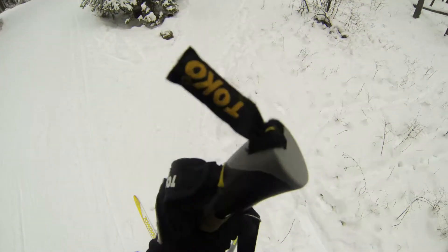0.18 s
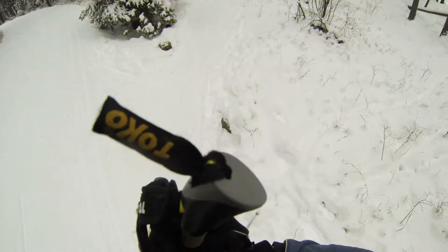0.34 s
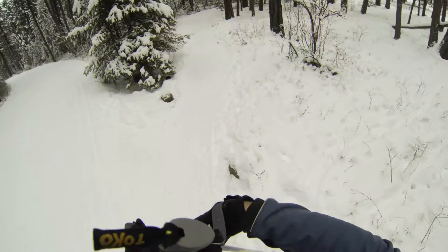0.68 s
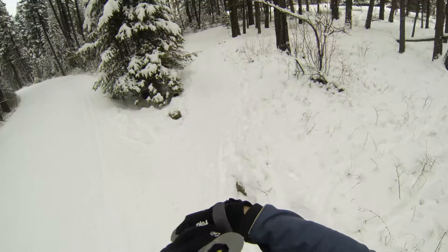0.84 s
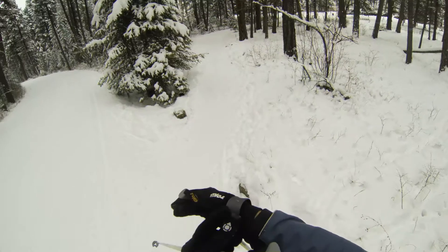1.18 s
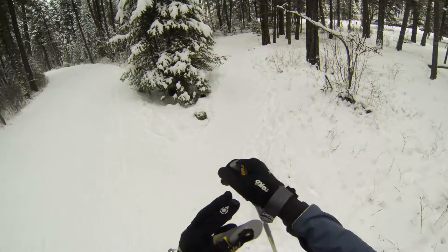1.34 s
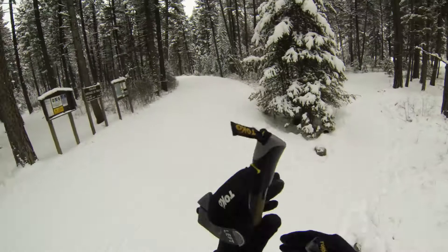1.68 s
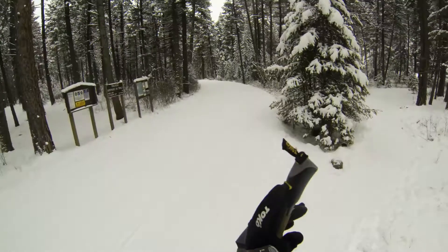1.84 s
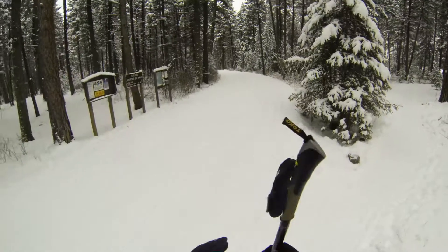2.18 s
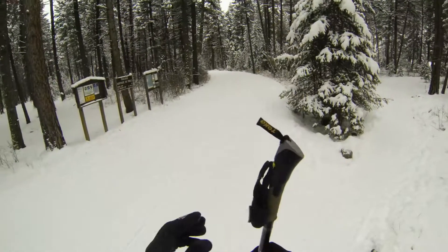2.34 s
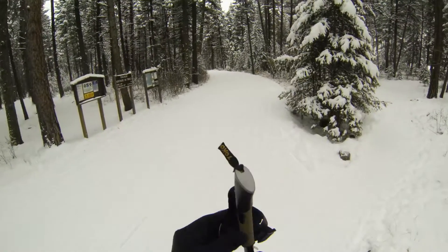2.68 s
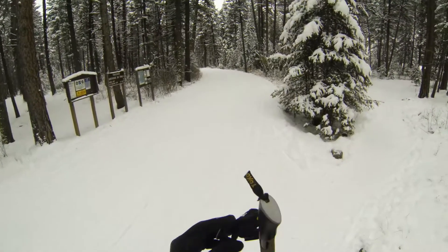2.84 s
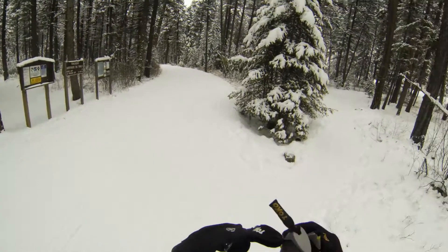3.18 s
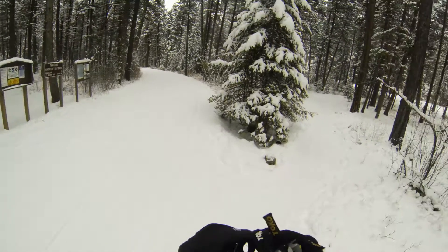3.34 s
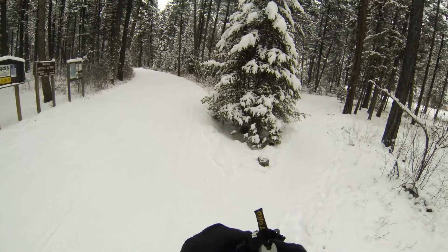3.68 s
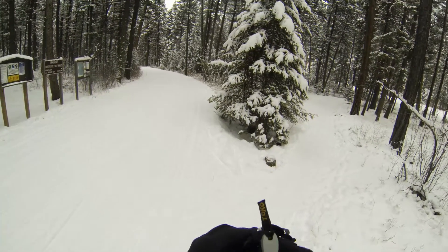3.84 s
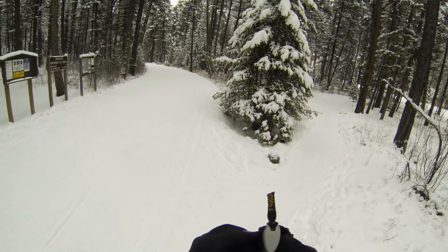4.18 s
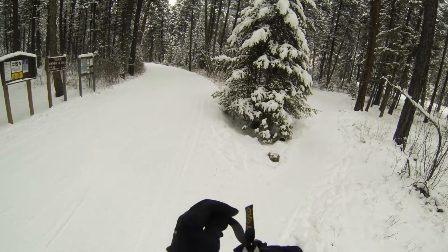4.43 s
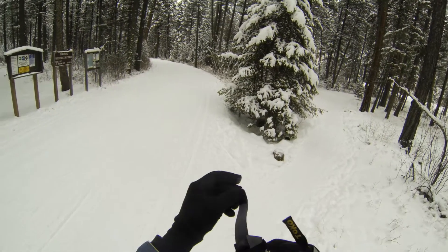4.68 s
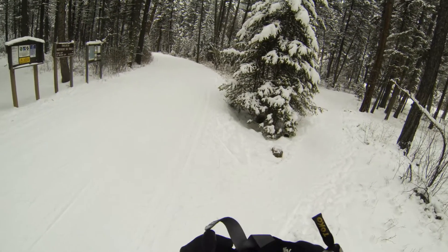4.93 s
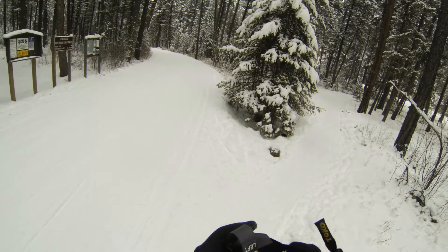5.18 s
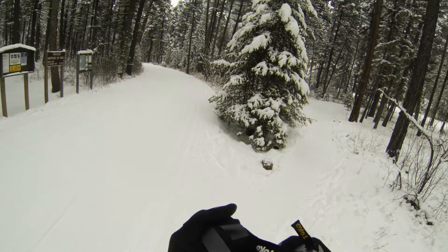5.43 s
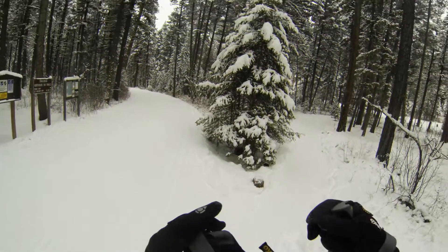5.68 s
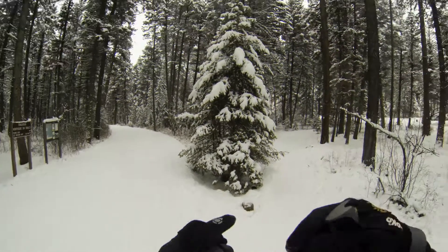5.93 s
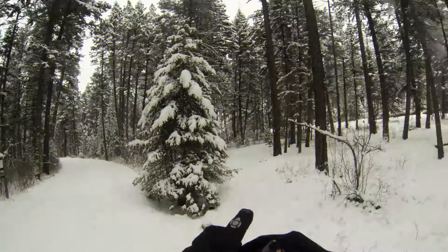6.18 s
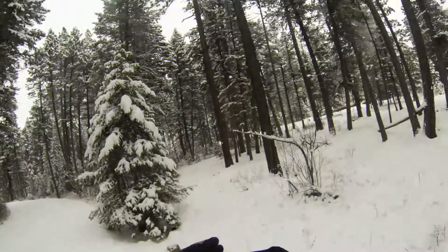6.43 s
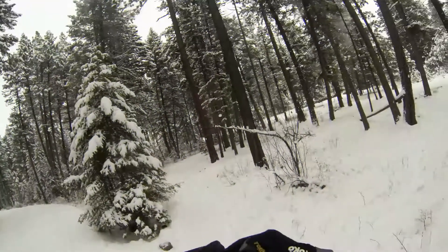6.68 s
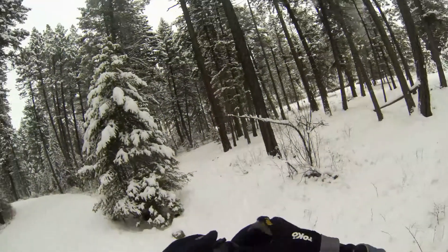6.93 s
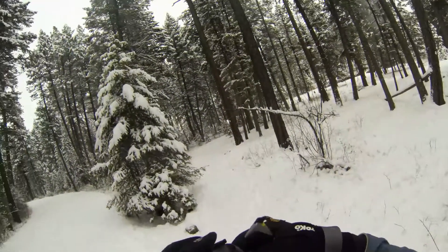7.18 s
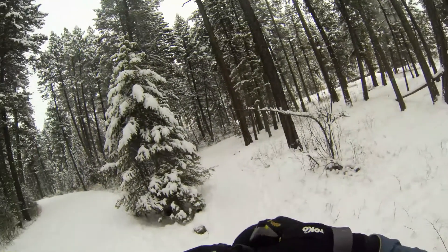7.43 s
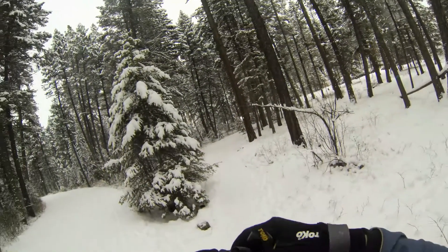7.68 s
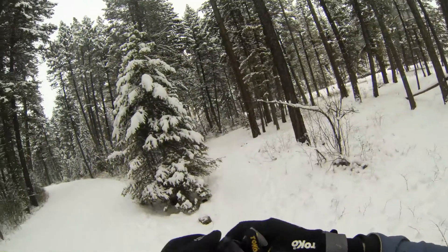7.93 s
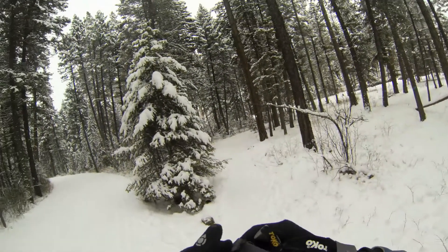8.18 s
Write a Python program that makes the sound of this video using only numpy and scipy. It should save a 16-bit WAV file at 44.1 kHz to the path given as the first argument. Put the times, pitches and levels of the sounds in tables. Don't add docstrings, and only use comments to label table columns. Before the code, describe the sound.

Outdoors on packed snow, heard from inside a sealed helmet-camera case. Low wind rumble buffets the microphone while two ski poles clack four times, each louder, with a short echo. A ski scrapes the crust and a pole grip is knocked. Gloves and straps rub and tick, a buckle snaps, a strap rips open, another buckle snaps, and finally a pole shaft pings.

```python
import sys
import numpy as np
from scipy import signal
from scipy.fft import rfft, irfft, next_fast_len
from scipy.io import wavfile
from scipy.ndimage import uniform_filter1d, map_coordinates

SR = 44100
rng = np.random.default_rng(int(sys.argv[2]) if len(sys.argv) > 2 else 0)


def store_pcm(level_fs):
    pcm = np.round(np.clip(level_fs, -1, 1) * 32767).astype(np.int16)
    wavfile.write(sys.argv[1], SR, np.atleast_2d(pcm).T)


def makeup_ratio(level_db):
    decades = np.asarray(level_db, float) / 20
    return 10 ** decades


N = 365588

# time in seconds, deep rumble in dB, upper rumble in dB re deep.
WIND_CURVE = [(0.0, -17, -10.5), (.3, -19, -8), (.55, -21, -12.5), (.9, -23, -12), (1.15, -26, -7),
              (1.35, -20.5, -8), (1.6, -23.5, -10), (1.95, -22, -10), (2.3, -32, -4), (2.75, -25.5, -8.5),
              (3.15, -30.5, -7), (3.7, -30.5, -6), (4.3, -31, -10), (4.7, -27, -10), (5.3, -27, -13.5),
              (6.3, -29.5, -9), (7.2, -31, -6.5), (8.29, -28.5, -8.5)]
# frequency in Hz, level in dB per Hz.
DEEP_SPECTRUM = [(5, -33), (12, 7.5), (25, 0), (40, -3.5), (70, -43), (200, -77.5)]
# frequency in Hz, level in dB per Hz.
UPPER_SPECTRUM = [(20, -59), (42, 3), (60, -1.5), (80, -9.5), (110, -23), (170, -31.5), (400, -67)]
# time in seconds, level in dB, frequency in Hz signed by
LOW_BUMPS = [
    (1.7565, -13.5, -64.5, 2.25),
    (3.983, -12.5, 40, 0.81),
    (4.61, -19, 40, 1.5),
    (6.81, -23, 61, 1.75),
    (.012, -13, 23.5, 1.17),
]
GUST_DEPTH_DB, GUSTS_PER_S = 1.63, 6

# frequency in Hz, level in dB per Hz.
HISS_SPECTRUM = [(30, -19.5), (100, -1), (300, -8.5), (860, -13.5), (1800, -18), (3200, -19.5),
                 (6300, -25.5), (7700, -28.5), (8300, -24.5), (9200, -28.5), (11200, -30.5), (13000, -35),
                 (13700, -32), (15000, -36)]
HISS_DB = -47.5
# frequency in Hz, level in dB.
WHINE_TONES = [(7028, -58.5), (14056, -58.5)]
# frequency in Hz, gain in dB.
WRITE_SAG = [(7000, 0), (8300, -2.5), (12000, -2), (13200, -4), (14400, -4), (15000, -5)]
# frequency in Hz, share of patches lost.
TOP_GAPS = [(12600, 0), (13000, .4), (14000, .35), (14500, .55), (15000, .85)]
WRITES_PER_S, FIRST_WRITE_S, LATE_S = 12, .002, .006
WRITE_MS, WRITE_SPREAD_MS = 34, 4

# frequency in Hz, width in Hz, level in dB.
CASE_FAMILIES = [
    [(1244, 112, -4.5), (1436, 137, -2), (1579, 78, 1.5), (1968, 89, -13)],
    [(2176, 130, 3.5), (2392, 170, -1)],
    [(2915, 200, -5), (2873, 67, -6), (3162, 156, 2.5), (3576, 440, -7)],
    [(4650, 140, 3.5), (5380, 340, -7.5), (6410, 280, -5.5), (8230, 500, -8), (9670, 410, -11),
     (12700, 4400, -23.5)],
]

# time in seconds, effort in dB.
RUSTLE_CURVE = [(0.0, -56), (0.3, -51), (1.13, -51), (1.27, -44), (1.34, -38), (1.43, -46), (1.68, -51),
                (2.33, -54.5), (2.72, -47), (3.35, -47), (3.88, -52), (4.48, -50), (4.7, -53.5),
                (5.79, -53.5), (6.26, -48.5), (6.55, -55), (7.02, -49), (8.29, -56)]
THIRD_DB, THIRD_FOLLOWS = -62, 0.62
# time in seconds, level in dB.
SCRAPE_CURVE = [(1.2, -44), (1.21, -51), (1.242, -32.5), (1.292, -23.5), (1.358, -34.5), (1.544, -41.5),
                (1.61, -56), (1.62, -40), (1.66, -55)]
# frequency in Hz, level in dB per Hz.
CRUST_SPECTRUM = [(50, -45), (140, -9), (300, -22), (600, -24), (1000, -20), (1250, -1), (1600, -1),
                  (2000, -13), (2400, -15), (3200, -24), (3900, -30.5), (5500, -48), (9000, -70)]

# start in seconds, length in ms, first family in dB, third in dB re first.
RUBS_LONG = [(.402, 27, -47, -7), (1.865, 53, -43.5, -4), (1.94, 30, -49.5, -9), (2.52, 57, -45.5, -13),
             (2.722, 137, -47, -6.5), (2.565, 30, -58, 3), (3.09, 60, -59, 2.2), (3.19, 99, -54.5, -1.2),
             (3.935, 44, -50.5, -1.5), (4.045, 31, -62.5, 10), (4.3, 70, -52, -1.2), (4.43, 83, -60.5, 6),
             (4.64, 64, -48, -7), (5.18, 54, -51.5, -5), (5.33, 50, -56, 0), (6.12, 59.6, -52.5, 1),
             (7.04, 110, -56, -4), (7.2, 110, -54, -8), (7.49, 40, -51.5, -3), (7.97, 45, -49.5, -10.5),
             (8.235, 37, -52, -2)]
RUB_SECOND_DB, RUB_FOURTH_DB = -10.5, -6.5

# time in seconds, first family in dB, third in dB re first.
FAINT_TICKS = [(0.4549, -41, -6), (1.879, -43, -5), (2.8103, -47, -2.2), (3.745, -39, -7),
               (3.937, -39, -13), (4.0432, -52, 6), (4.0891, -50, 12), (4.3697, -46, 8), (4.6594, -44, -9),
               (4.833, -42, 2), (5.034, -41.5, 4), (5.084, -39, -4), (6.135, -39, -5), (6.5094, -42.5, 3.5),
               (6.9336, -40, 0), (7.047, -39, -16), (7.135, -42.5, 2), (7.4974, -40, 1.2),
               (7.976, -46, -15), (8.2432, -39, 0)]
TICK_SECOND_DB, TICK_FOURTH_DB, TICK_MS = -12, -4, 2.3
# time in seconds, first family in dB,
# third in dB re first, fourth in dB re first, contact in ms.
FIRM_SNAPS = [(0.4, -24, 0.5, -11, 6.4), (0.4912, -28, 2, -10, 2.7), (1.2446, -24, -26, -33, 2.7),
              (1.6193, -30.5, 3, -2, 2.5), (1.7266, -29, 0, -9, 2.5), (1.7342, -28, -22, -26, 2.5),
              (1.7401, -25, -12, -18, 2.5), (1.7625, -31, -1.5, -3, 1.7), (1.8995, -37, -2, -5, 2.5),
              (2.5212, -34, 0.5, -17, 3.3), (2.6336, -42, 10, -1, 2.9), (2.7266, -34.5, -1, -5, 3.4),
              (2.7706, -37, 4, -3, 3.4), (4.226, -34, 2, -18, 2.5), (4.3363, -31, 5.5, -12, 5.4),
              (6.121, -35, -2, -8, 2.5), (6.296, -35.5, -17, 0.5, 2.1), (7.928, -37, -17, -18.5, 2.5),
              (8.0778, -33, -12, -18, 2.1), (8.1534, -37.5, -4, -16, 2.5)]
SNAP_SECOND_DB = -3

# time in seconds, third family in dB, first in dB re third.
STRAP_HOOKS = [(4.1121, -30, -13), (4.1177, -32, -10.2), (4.125, -29, -12), (4.1317, -30, -11),
               (4.141, -21, -15), (4.146, -20, -10.2), (4.153, -17, -10), (4.16, -35, 6), (4.166, -25, -6),
               (4.17, -22, -13), (4.1806, -25.5, -2), (4.187, -28, 1), (4.1949, -23, -4), (4.1984, -25, -3),
               (4.204, -21.5, -17)]
HOOK_FOURTH_DB, TIGHTEN_DB_PER_S = -21.5, 132

# frequency in Hz, level in dB, t60 in seconds.
RINGING_STRIKES = [
    ((3.859, -19, 0.34), [(1260, -7.5, 0.044), (1640, 2, 0.022), (1950, -2.5, 0.019), (2420, -4.5, 0.02), (2780, -6, .016), (3140, -5, 0.018), (3800, -7, .014), (4520, -10, 0.013), (5480, -5.5, 0.013), (7840, -7, 0.0094), (14000, -16, .007)]),
    ((6.105, -14.5, 0.35), [(1254, -7.5, 0.035), (1550, 2, 0.021), (2370, -12.5, .02), (3310, 1, 0.013), (4670, -16, .012), (7400, -7, 0.0079), (11100, -15, 0.008)]),
    ((6.778, -15, .8), [(1611, 0, 0.087), (1405, -5, 0.041), (1526, -2, .045), (1910, -22, .05), (2240, -11.5, 0.031), (3230, -18, .012), (4600, -28, .006)]),
]
# third family in dB, fourth family in dB.
STRIKE_CRACKS = [
    (-23.5, -28.5),
    (-27, -25.5),
    (-33, -41),
]
# frequency in Hz, level in dB, t60 in seconds.
GRIP_MODES = [(650, -11.5, 0.054), (1390, 0, 0.034), (1600, -9, 0.046), (2230, -9, 0.03), (3170, -6, 0.018),
              (3655, -17, 0.015), (4700, -16, 0.008)]
# time in seconds, level in dB, rise in ms.
GRIP_BLOW = (1.7265, -18.5, 0.36)

# time in seconds, peak in dB, low modes in dB re peak.
POLE_CLACKS = [
    (0.2399, -16.5, -4.5),
    (0.5183, -12.5, -3),
    (0.7974, -9.5, -3.5),
    (1.072, -2.5, -8),
]
# frequency in Hz, width in Hz, level in dB.
POLE_LOW_MODES = [(826, 56, -20), (1259, 40, 0), (1565, 97, -1), (1890, 97, -5.5)]
# frequency in Hz, width in Hz, level in dB.
POLE_HIGH_MODES = [(2380, 82, -4), (2790, 164, 2), (3150, 364, 3), (3457, 362, -1.5), (4050, 150, -25),
                   (4700, 100, -18.5), (5200, 190, -23.5), (7700, 500, -37)]
CLACK_VARY_DB = 1.8
# echo delay in seconds, echo in dB, scatter in dB, t60 in seconds of low and of high modes.
GROUND_REPLY = (.0172, -14.5, -15, 0.2, 0.23)


def unit(x):
    return x / np.sqrt(np.mean(x ** 2) + 1e-20)


def curves(rows):
    s, *cols = np.transpose(rows)
    return [np.interp(np.arange(N) / SR, s, c, -120, -120) for c in cols]


def on_log(points, hz):
    f, v = np.transpose(points)
    return np.interp(np.log(hz + 1), np.log(f), v)


def wobble(knots_per_s):
    knots = rng.standard_normal(int(N * knots_per_s / SR) + 4)
    return map_coordinates(knots, [np.arange(N) * knots_per_s / SR])


def filtered(x, response):
    m = next_fast_len(N + SR // 2)
    return irfft(rfft(x, m) * response(np.fft.rfftfreq(m, 1 / SR)), m)[..., :N]


def coloured(x, spectrum):
    return unit(filtered(x, lambda hz: makeup_ratio(on_log(spectrum, hz))))


def grit(spread_db, clumps_per_s, depth_db):
    size = np.minimum(rng.exponential(size=N), 3)
    clump_db = depth_db * np.clip(wobble(clumps_per_s), -2, 2)
    return unit(rng.standard_normal(N) * makeup_ratio(spread_db * size + clump_db))


def family(x, modes):
    f = np.fft.rfftfreq(8192, 1 / SR)
    ring = 0
    for k, (hz, width_hz, db) in enumerate(modes):
        damping = 1j * f * width_hz
        ring = ring + (-1) ** k * makeup_ratio(db) * damping / (hz * hz - f * f + damping)
    band_hz = [0.8 * modes[0][0], 1.49 * modes[-1][0]]
    walls = signal.freqs(*signal.butter(3, band_hz, "band", analog=True), f)[1]
    answer = irfft(ring * walls)
    return signal.oaconvolve(x, answer / np.abs(answer).max())[:N]


def contacts(rows):
    force, t = np.zeros((4, N + 2000)), np.arange(2000) / SR
    for s, *db, ms in rows:
        burst = rng.standard_normal(len(t)) * np.exp(-t * 1000 / ms)
        burst[0] = 0.66 * np.linalg.norm(burst)
        colour = rfft(burst)
        even = irfft(colour / np.abs(colour) ** .8, len(t))
        burst = even * np.exp(-t * 400 / ms)
        burst = burst / np.linalg.norm(burst)
        force[:, round(s * SR):][:, :len(t)] += makeup_ratio(np.array(db))[:, None] * burst
    return sum(family(f[:N], modes) for f, modes in zip(force, CASE_FAMILIES))


def writes():
    k = np.arange(int(N / SR * WRITES_PER_S) + 1)
    luck = rng.standard_normal((len(k), 2))
    start_s = FIRST_WRITE_S + k / WRITES_PER_S + LATE_S * np.abs(luck[:, 0])
    return list(zip(start_s, WRITE_MS + WRITE_SPREAD_MS * luck[:, 1]))


def electronics(air):
    t, whine, busy = np.arange(N) / SR, np.zeros(N), np.zeros(N)
    jobs = writes()
    for (s, ms), turn in zip(jobs, rng.uniform(size=len(jobs))):
        now = slice(round(s * SR), round((s + ms / 1000) * SR))
        u = t[now] - s
        busy[now] = 1
        edge_s = np.minimum(np.abs(u - .0165) - .0025, np.minimum(u, ms / 1000 - u))
        fade = np.clip(edge_s / 0.0022, 0, 1)
        for k, (hz, db) in enumerate(WHINE_TONES):
            whine[now] += makeup_ratio(db) * fade * np.sin(2 * np.pi * (hz * u + (k + 1) * turn))

    hiss = makeup_ratio(HISS_DB) * coloured(rng.standard_normal(N), HISS_SPECTRUM)
    busy = uniform_filter1d(busy, size=SR // 100)
    sagged = filtered(hiss, lambda hz: makeup_ratio(on_log(WRITE_SAG, hz)))
    hiss = (1 - busy) * hiss + busy * sagged

    hz, frame_s, z = signal.stft(air + hiss, SR, nperseg=1024)
    luck = rng.uniform(size=(len(hz) // 7 + 1, z.shape[1] // 2 + 1))
    luck = luck.repeat(7, axis=0).repeat(2, axis=1)
    luck = (luck + luck[:1]) / 2
    need = .6 + .8 * np.interp(frame_s, t, busy)
    kept = luck[:len(hz), :z.shape[1]] > .15 + .7 * on_log(TOP_GAPS, hz)[:, None] * need
    kept |= hz[:, None] < TOP_GAPS[0][0]
    return whine + signal.istft(z * kept, SR, nperseg=1024)[1][:N]


def wind():
    t, out = np.arange(N) / SR, 0
    deep_db, upper_db = curves(WIND_CURVE)
    for db, spectrum in [(deep_db, DEEP_SPECTRUM), (deep_db + upper_db, UPPER_SPECTRUM)]:
        z = coloured(rng.standard_normal(N), spectrum)
        swell = np.sqrt(np.abs(uniform_filter1d(z * z, size=SR // 7)) + .05)
        out = out + makeup_ratio(db + GUST_DEPTH_DB * wobble(GUSTS_PER_S)) * unit(z / swell ** 0.96)
    for s, db, hz, cycles in LOW_BUMPS:
        shape = np.exp(-((t - s) * hz / cycles * 2) ** 2)
        out = out * (1 - 0.96 * shape) + makeup_ratio(db) * np.sin(2 * np.pi * hz * (t - s)) * shape
    return out


def cloth():
    low_db, = curves(RUSTLE_CURVE)
    mid_db = THIRD_DB + 3 + THIRD_FOLLOWS * (low_db - low_db.mean())
    rub = grit(3.6, 45, depth_db=4.0)
    first, second, third, fourth = (unit(family(rub, modes)) for modes in CASE_FAMILIES)
    hum = unit(family(rng.standard_normal(N), CASE_FAMILIES[0][2:]))
    low = makeup_ratio(low_db - 5.0) * (makeup_ratio(-3) * first + makeup_ratio(-5.5) * hum + makeup_ratio(-13.5) * second)
    return low + makeup_ratio(mid_db - 3.0) * (third + makeup_ratio(-7.5) * fourth)


def rubs():
    t, press = np.arange(N) / SR, np.zeros((4, N))
    for s, ms, low, mid in RUBS_LONG:
        db = [low, low + RUB_SECOND_DB, low + mid, low + mid + RUB_FOURTH_DB]
        u = np.clip((t - s) * 1000 / ms, 0, 1)
        press += makeup_ratio(np.array(db))[:, None] * np.sin(np.pi * u ** 0.52) ** .5
    rub = grit(2.9, 120, depth_db=4.0)
    rub = rub / np.sqrt(np.abs(uniform_filter1d(rub * rub, size=SR // 30)) + .05)
    return sum(p * unit(family(rub, modes)) for p, modes in zip(press, CASE_FAMILIES))


def ticks():
    firm = [(s, db, db + top + SNAP_SECOND_DB, db + mid, db + top, ms)
            for s, db, mid, top, ms in FIRM_SNAPS]
    faint = [(s, db, db + TICK_SECOND_DB, db + mid, db + TICK_FOURTH_DB, TICK_MS)
             for s, db, mid in FAINT_TICKS]
    return contacts(firm + faint)


def ski():
    level_db, = curves(SCRAPE_CURVE)
    return makeup_ratio(level_db) * coloured(grit(2.4, 70.2, depth_db=1.0), CRUST_SPECTRUM)


def strap():
    start_s = STRAP_HOOKS[0][0]
    hooks = contacts([(s, db + low, db - 15.5, db, db + HOOK_FOURTH_DB + TIGHTEN_DB_PER_S * (s - start_s), .7)
                      for s, db, low in STRAP_HOOKS])
    pull = np.interp(np.arange(N) / SR, [4.108, 4.13, 4.16, 4.2, 4.211], [0.027, 0.65, 0.72, 0.56, 0.018])
    fizz = pull * grit(3.3, 180, depth_db=2.5)
    family_db = (-53.5, -60, -50.5, -52.5)
    return hooks + sum(makeup_ratio(db) * family(fizz, modes) for db, modes in zip(family_db, CASE_FAMILIES))


def cracks():
    return contacts([(s, -np.inf, -np.inf, *db, 1.2)
                     for ((s, *_), _), db in zip(RINGING_STRIKES, STRIKE_CRACKS)])


def strikes():
    out, t = np.zeros(N), np.arange(SR // 4) / SR
    for (s, db, rise_ms), modes in RINGING_STRIKES + [(GRIP_BLOW, GRIP_MODES)]:
        ring = 0
        for hz, level_db, t60_s in modes:
            decay = makeup_ratio(db + level_db - 60 * t / t60_s)
            ring = ring + decay * np.sin(2 * np.pi * (hz * t + rng.uniform()))
        shell = signal.butter(4, .8 * min(modes)[0], "high", fs=SR, output="sos")
        out[round(s * SR):][:len(t)] += signal.sosfilt(shell, ring * (1 - np.exp(-t * 1000 / rise_ms)))
    return out


def struck(modes, s, db, vary):
    blow = makeup_ratio(db) * (np.arange(N) == round(s * SR))
    return family(blow, [(hz, w, level + CLACK_VARY_DB * v) for (hz, w, level), v in zip(modes, vary)])


def clacks():
    vary = rng.standard_normal((len(POLE_CLACKS), len(POLE_LOW_MODES)))
    low, high = 0, 0
    for (s, db, low_db), v in zip(POLE_CLACKS, vary):
        low = low + struck(POLE_LOW_MODES, s + 0.00059, db + low_db, v)
        high = high + struck(POLE_HIGH_MODES, s + .0002, db, np.zeros(len(POLE_HIGH_MODES)))

    lag_s, echo_db, tail_db, *t60s = GROUND_REPLY
    t, out = np.arange(SR // 4) / SR, 0
    scatter = rng.standard_normal(len(t)) * makeup_ratio(3 * wobble(300)[:len(t)])
    scatter *= np.clip(t / lag_s, 0, 1) ** 0.43
    for direct, t60_s in zip((low, high), t60s):
        tail = scatter * makeup_ratio(-60 * t / t60_s)
        answer = makeup_ratio(tail_db) * tail / np.linalg.norm(tail)
        answer[round(lag_s * SR)] += makeup_ratio(echo_db)
        out = out + direct + signal.fftconvolve(direct, answer)[:N]
    return out


def scene():
    background = wind() + cloth() + rubs() + ticks()
    events = ski() + strap() + cracks() + strikes() + clacks()
    return electronics(background + events)[None]


def roll_off(x):
    return signal.sosfilt(signal.butter(12, 15200, fs=SR, output="sos"), x)


def record(dry):
    mix = filtered(dry, lambda hz: hz < 15100)
    return roll_off(mix)


dry = scene()
out = record(dry)
store_pcm(out)
```